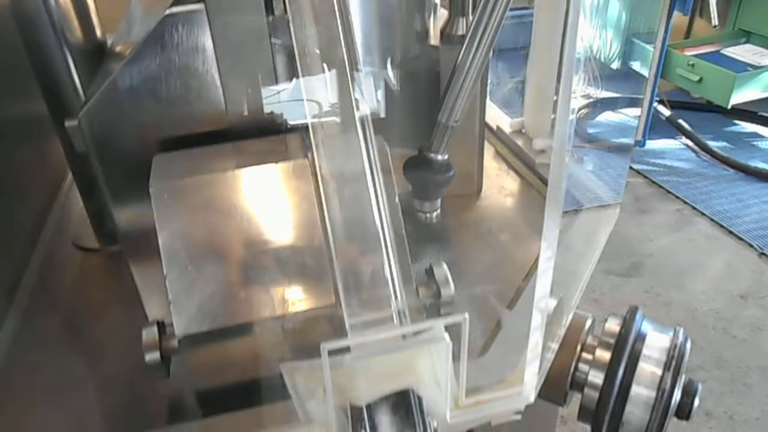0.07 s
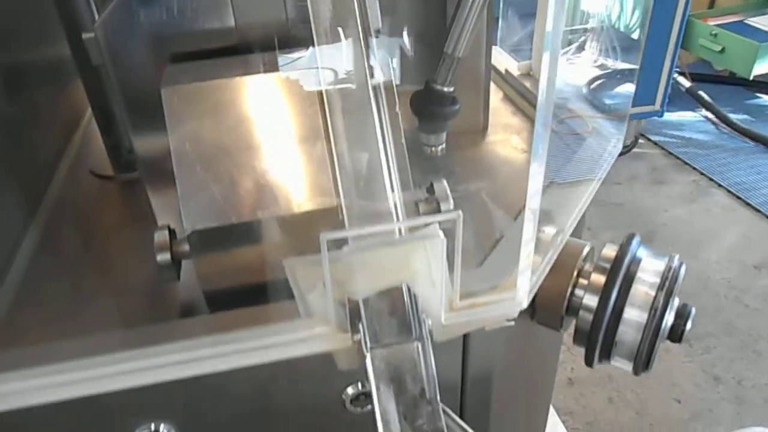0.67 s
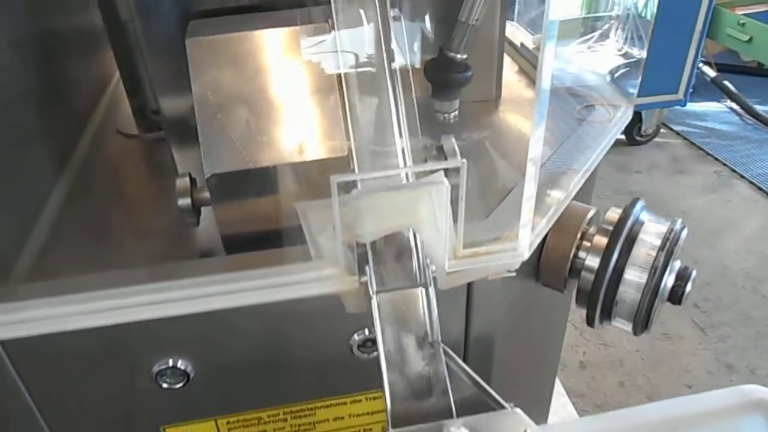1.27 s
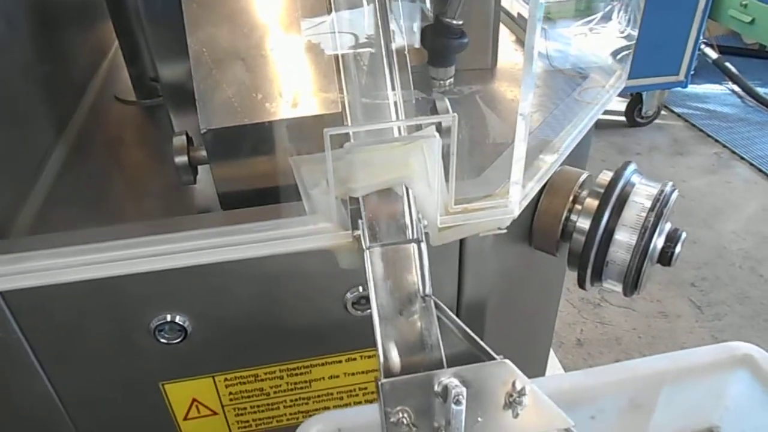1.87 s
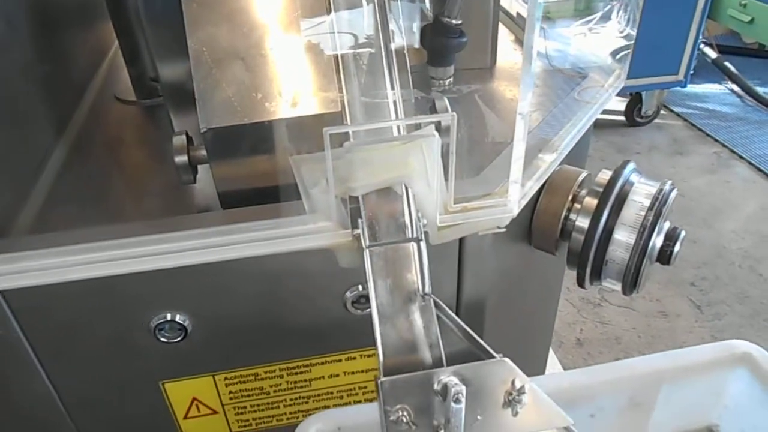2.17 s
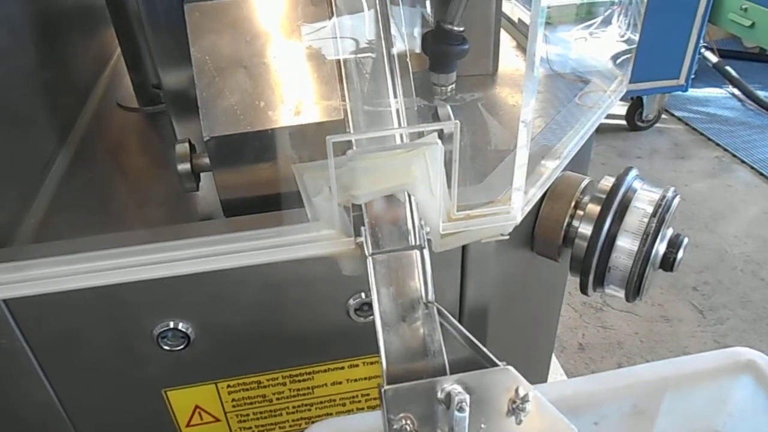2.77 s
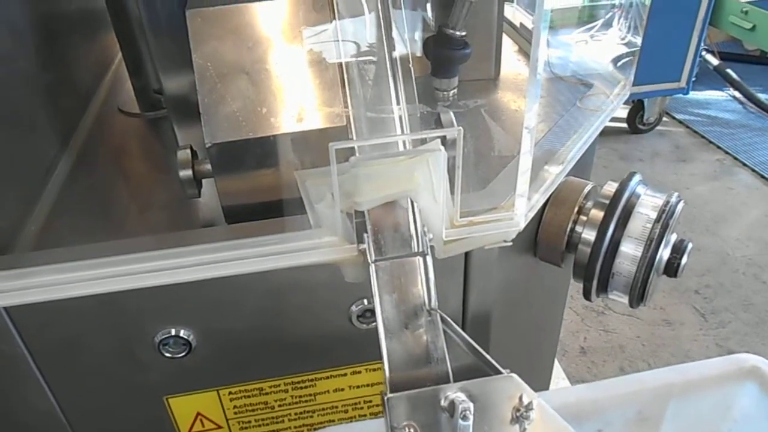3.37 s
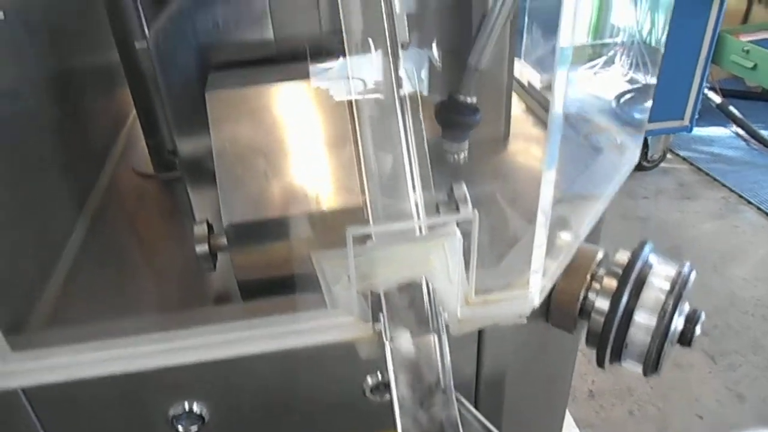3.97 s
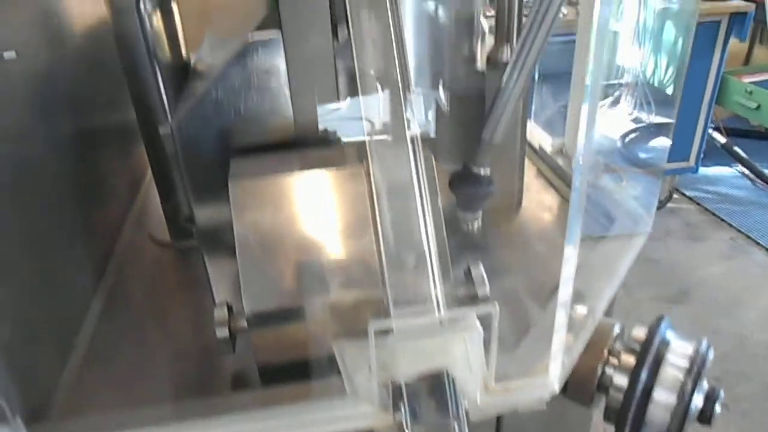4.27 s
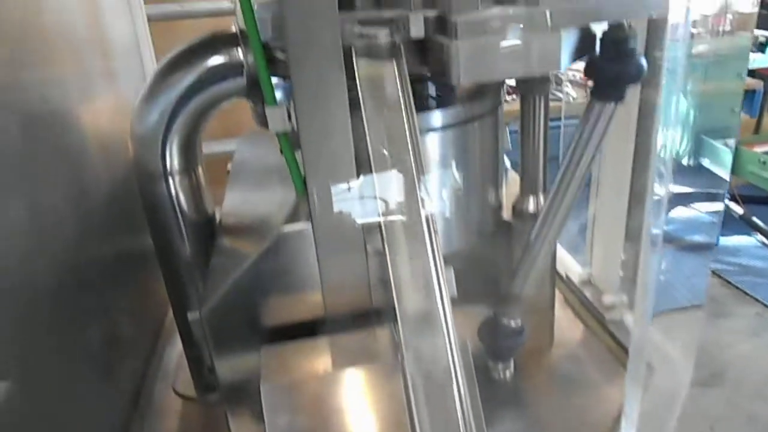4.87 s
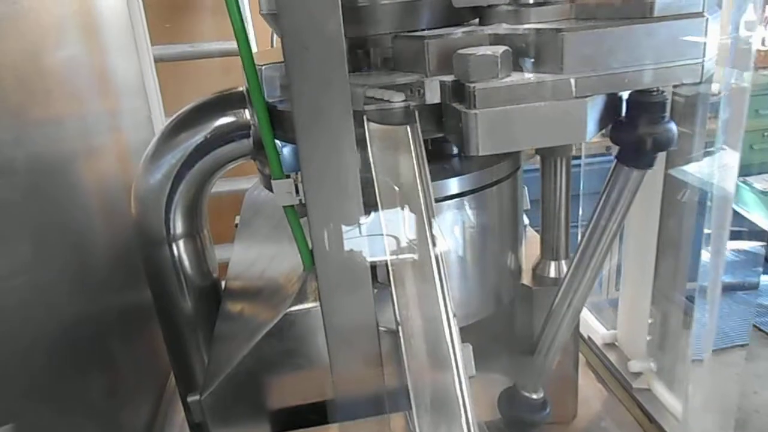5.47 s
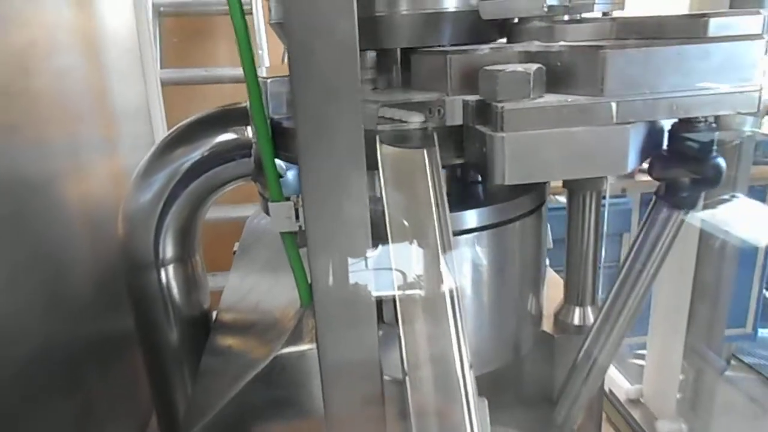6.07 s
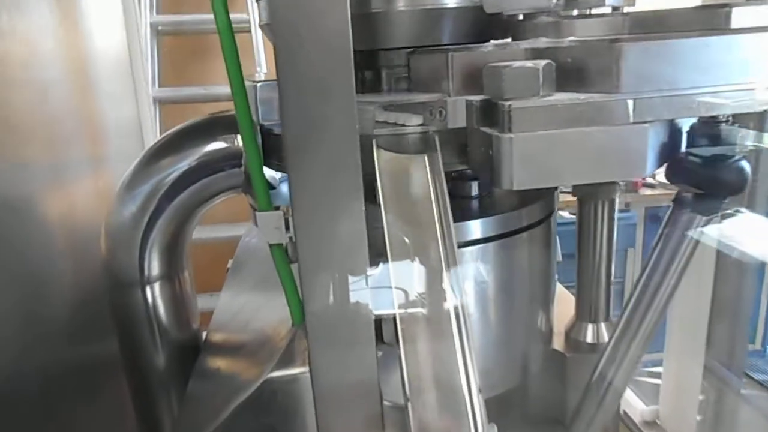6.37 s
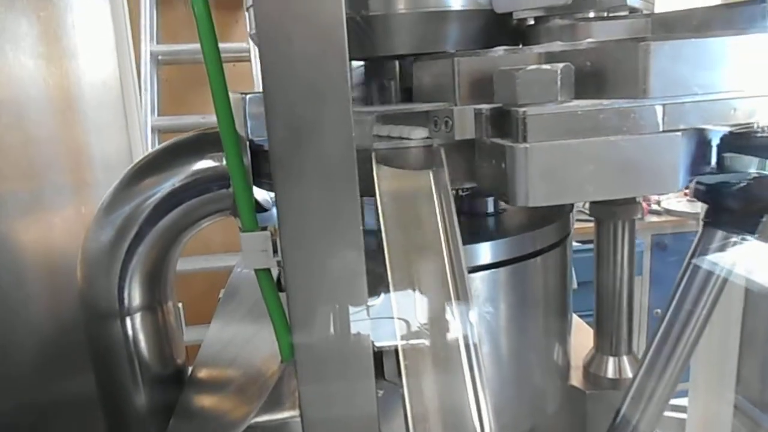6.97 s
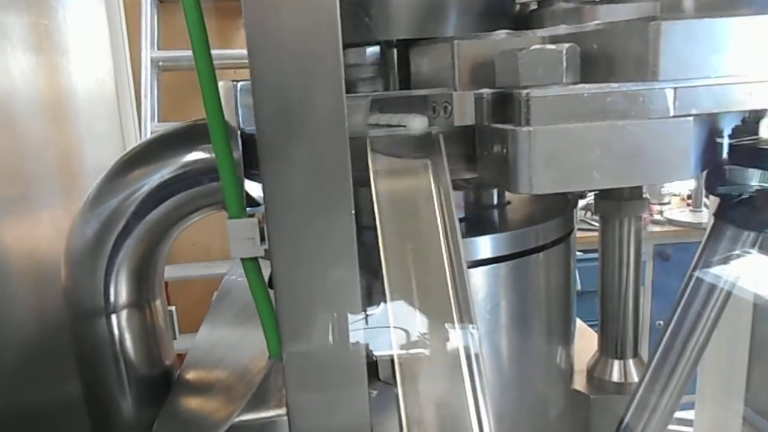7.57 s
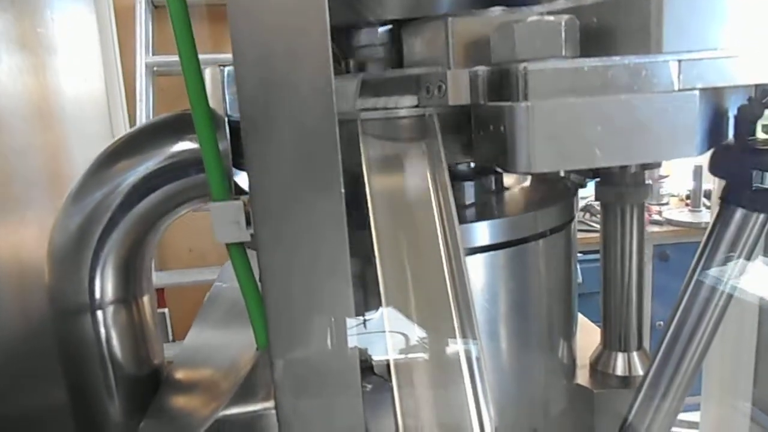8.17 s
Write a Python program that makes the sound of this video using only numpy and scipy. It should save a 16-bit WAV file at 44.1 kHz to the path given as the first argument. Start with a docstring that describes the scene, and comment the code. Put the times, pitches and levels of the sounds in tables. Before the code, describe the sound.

A rotary tablet press runs close to the microphone in a workshop, loud and steady for the whole eight seconds. Its roar is a dense, bright rattle of metal parts ringing a steel casing, over a lower rumble, a motor hum and one clear, mid-pitched whine. About five times a second, each turn adds a thin metal scrape and a very soft thud. Tablets hit the outlet chute with dry, sharp ticks, unevenly spaced at roughly four or five a second, thinning a little after 6 seconds. Brief ringing notes rise from the roar and sink back, for instance near 0.2, 1.6, 3.1 and 4.4 seconds. The microphone is by the chute from about 1.5 to 4 seconds, then passes the guard and reaches the turning head around 6.5 seconds, where the roar becomes slightly fuller and deeper. The machine never stops.

```python
"""A rotary tablet press roars close by in a workshop, heard at the outlet chute, then up at the turret.
Punches rattle in their cams and ring the steel casing, and single notes swell out of the roar.
The drive hums and whines, and every turn brings a soft thud and a metal scrape.
Tablets strike the chute with dry ticks; the hardest push the recorder's gain down, and it creeps back."""
import sys
import numpy as np
from scipy import signal
from scipy.fft import rfft, irfft, next_fast_len
from scipy.io import wavfile
from scipy.ndimage import uniform_filter1d

SR = 44100
rng = np.random.default_rng(int(sys.argv[2]) if len(sys.argv) > 2 else 0)


def digitize_waveform(pressure):
    """Quantize a signal to 16-bit integers and store it at the path in sys.argv[1].

    Rows of a 2-D input are taken as channels; values are limited to [-1, 1].
    """
    field = np.atleast_2d(pressure).T
    bounded = np.clip(field, -1, 1)
    quanta = np.round(bounded * 32767).astype(np.int16)
    wavfile.write(sys.argv[1], SR, quanta)


N = 362061
TIME = np.arange(N) / SR

# The listener's path. Each row: time in seconds, place (0 at the chute, 1 at the guard, 2 at the turret).
LISTENER_PATH = [(0, 0.84), (.5, 0.58), (1.1, 0.26), (1.5, 0), (3.8, 0.1), (4.25, 0.6), (4.6, 0.95),
                 (5.9, 1.03), (6.6, 1.67), (7.3, 1.7), (8.2, 2)]
# Faders of the roar along that path. Each row: time in seconds, rattle level in dB, rumble level in dB.
ROAR_LEVELS = [(0, -21.5, -29.5), (.5, -22.5, -29), (.88, -21.5, -29), (1.3, -23, -29),
               (1.85, -22.5, -29.5), (2.5, -23, -29.5), (2.95, -22.5, -29.5), (3.18, -21, -28.5),
               (3.45, -23, -29), (3.9, -24, -30.5), (4.33, -21.3, -29), (4.7, -24.5, -30.5),
               (5.3, -23, -29.5), (5.7, -22, -28.5), (6.15, -23, -29), (6.5, -21.5, -28.5),
               (7.25, -22, -27.5), (8.2, -20.5, -26.5)]
# The roar's broad colour, with the recorder's dulling of the top above about 10.5 kHz.
# Each row: frequency in Hz, then gain in dB at chute, guard and turret.
BROAD_EQ = [(25, -21, -25, -25), (42, -11, -12, -5.5), (125, -11, -8, -11), (189, -2.5, -4.5, -4.5),
            (420, -4.5, -3, -0.5), (815, -3.5, -3, -1), (2200, 2.5, -1.5, -0.5), (2720, 2, -1, -3),
            (3800, 3.5, 1.5, 0.5), (6240, 0, -2, 1.5), (8300, -4.5, -7.5, -7.5), (10010, -8, -10.5, -10),
            (10930, -26.5, -27.5, -25.5), (12300, -34, -37, -36)]
# Resonances of casing and guards. Each row: pitch in Hz, width in Hz, then strength in dB at chute,
# guard and turret.
CASING_MODES = [(177.5, 49, 2.5, 4, 4), (553, 45, 1, 1.5, -4), (617, 93, 5, -9, 0), (898, 41, 2, 1.5, 2.5),
                (1055, 16, 4.5, 8.5, -10), (1258, 54, 5.5, 0, -10), (1387, 22, 10.5, 5.5, 1),
                (1435, 96, 5.5, 2.5, 1), (1660, 125, -1, 2.5, 9.5), (1783, 43, 10, 13.5, 11),
                (1860, 42, 7, 14, 10.5), (1962, 63, -8, 2, 13), (2034, 410, 0.5, 7.5, 1.5),
                (2182, 49, 9, -11, 11.5), (2420, 210, 7.5, -11, 9.5), (2535, 110, 2.5, -1, -8),
                (2919, 33, 8, 10, 5), (3090, 1140, -12, 0.5, 7.5), (3214, 120, 2, 6.5, -3),
                (4610, 220, -1.5, -15, -12), (5040, 74, 1, -12, -14), (5600, 370, -3.5, 1, -4),
                (7400, 240, -5, -13, 0)]
# The drive's steady hum. Each row: pitch in Hz, level in dB, depth of waver from 0 to 1.
HUM_TONES = [(65.4, -58, .6), (100.7, -47.5, 0.02), (188.8, -43.5, 0.05), (312.6, -47.5, 0.17),
             (376.5, -51.5, .2), (396, -47, 0), (1136, -44, 0)]
# The drive's whine, with dead spots near the turret. Each row: time in seconds, level in dB.
WHINE_LEVELS = [(0.0, -32), (0.6, -35.5), (1.1, -34), (3.7, -37), (4.4, -35), (5.1, -34), (5.33, -39.7),
                (5.6, -33), (6.5, -35.5), (6.72, -39.5), (7.0, -35), (8.2, -33)]
# Steel parts that scrape once a turn. Each row: pitch in Hz, width in Hz, point in the turn from 0 to 1,
# half-length in turns, then level in dB at chute, guard and turret.
STEEL_SCRAPES = [(3420, 47, 0.67, 0.19, -33, -31.5, -31), (3424, 38, 0.07, 0.24, -31.5, -34, -34.5),
                 (3503, 43, 0.61, 0.19, -31, -34.5, -44), (3382, 88, 0.84, 0.18, -42, -45, -27),
                 (3630, 120, 0.32, 0.092, -59, -36, -55)]
# Tablets hitting the chute. Each row: start in seconds, contact level in dB, ring level in dB,
# ring pitch in Hz, knock level in dB.
TABLET_HITS = [(0.074, -2, -16.1, 3660, -27), (0.2776, -1, -21, 3010, -26),
               (0.4473, -5.3, -20.5, 5850, -25), (0.816, -6.9, -18.5, 4380, -26.5),
               (0.9662, -5, -20, 2350, -19), (0.9818, 0.5, -19, 3410, -26),
               (1.282, 0.2, -18.5, 4270, -22.2), (1.4485, -5.5, -19.5, 3840, -25.7),
               (1.775, -7.9, -21, 3280, -26.3), (1.8814, -4.5, -25, 4900, -30.1),
               (2.129, -4, -16.5, 3650, -21.5), (2.498, -6.4, -23, 3130, -24.9),
               (2.6835, -9, -21, 3830, -24), (2.8238, -9, -20.8, 3360, -22),
               (3.211, -4.5, -22.6, 3760, -22.5), (3.2725, -0.5, -17, 4040, -22),
               (3.53, -8, -20, 3190, -21), (3.69, -5.5, -27.6, 4070, -29.9),
               (3.7988, -7.9, -21, 3860, -26.6), (3.9787, -7.8, -22.2, 3430, -25),
               (4.359, -2.5, -17.5, 3590, -24.4), (4.4577, -4, -18.7, 4500, -25),
               (4.582, -1, -23, 3520, -26.5), (4.822, -4, -20.5, 4430, -20.4), (5.038, -9, -21, 3560, -23),
               (5.2053, -2, -19.5, 3630, -25), (5.5222, -6, -21.6, 2860, -26),
               (5.8177, -3.5, -19.0, 3420, -29), (5.8905, -3.5, -21, 3630, -23.4),
               (5.9861, -1.3, -19.5, 4400, -20.5), (6.1412, -5.8, -26, 4710, -21.7),
               (6.6091, -5.5, -18, 3640, -23.6), (6.858, -6.4, -20, 4020, -23),
               (7.1402, -8, -20.7, 3650, -21.9), (7.4398, -9, -19.3, 3000, -30),
               (7.7416, -3.5, -22.5, 4850, -20.5), (8.2017, -3.0, -18.9, 4000, -20)]
# Notes that stand out of the roar. Each row: crest time in seconds, pitch in Hz, width in Hz,
# half-length in seconds, level in dB.
SWELLING_NOTES = [(.21, 3460, 60, .03, -24), (.4, 1865, 40, 0.17, -34), (.5, 3420, 60, .03, -30),
                  (1.24, 3530, 120, .023, -24), (.55, 225, 35, .045, -35), (0.617, 152, 22, 0.054, -34.5),
                  (0.896, 3450, 70, .06, -32.5), (1.608, 3360, 50, .025, -27),
                  (1.725, 1410, 29.8, 0.048, -33), (3.102, 3450, 50, 0.078, -29.5),
                  (3.9, 3490, 120, .12, -33), (4.34, 3730, 70, 0.03, -30), (4.393, 3430, 40, .07, -27),
                  (4.98, 1800, 90, 0.068, -30), (5.698, 5500, 200, 0.24, -36),
                  (6.2, 1406, 110, 0.51, -34.5), (6.9, 3366, 70, .27, -35)]


def undb(db):
    """Decibels to gain."""
    return 10 ** (np.asarray(db) / 20)


def unit(x):
    """Scale to rms 1."""
    return x / np.sqrt(np.mean(x ** 2))


def unit_hit(x, spread_s=.007):
    """Scale a hit so that its energy, spread over spread_s, has rms 1."""
    return x * np.sqrt(spread_s * SR / np.sum(x ** 2))


def curves(table):
    """Automation curves, one for each column after the time."""
    times, *columns = np.transpose(table)
    return [np.interp(TIME, times, column) for column in columns]


def wander(per_s):
    """Smooth random motion of rms 1 that changes about per_s times a second."""
    points = rng.standard_normal(1024)
    path = np.interp(TIME * per_s, np.arange(len(points)), points)
    return unit(uniform_filter1d(path, int(SR / per_s / 2)))


def band(x, lo_hz, hi_hz):
    """Causal band-pass."""
    return signal.sosfilt(signal.butter(2, [lo_hz, hi_hz], "band", fs=SR, output="sos"), x)


def equalise(x, gain):
    """Filter by a gain given as a function of frequency."""
    size = next_fast_len(N)
    hz = np.arange(size // 2 + 1) * SR / size
    return irfft(rfft(x, size) * gain(hz), size)[:N]


def ringing_noise(hz, width_hz):
    """Noise rung through one narrow resonance."""
    return unit(band(rng.standard_normal(N), hz - width_hz / 2, hz + width_hz / 2))


def punch_impacts(per_s, spread_db, rush_db):
    """Countless small impacts of punches in their cams, a few harder than the rest, over an even rush."""
    sizes = undb(spread_db * np.minimum(rng.exponential(size=N), 3.5))
    impacts = (rng.random(N) < per_s / SR) * rng.choice([-1, 1], N) * sizes
    return unit(unit(impacts) + undb(rush_db) * rng.standard_normal(N))


def roar_eq(hz, place, ripple_db=3.0, ripple_hz=38, dense_hz=3600):
    """The roar's EQ at one place: broad colour, the recorder's dulled top and the casing's resonances."""
    broad_hz, *broad_db = np.transpose(BROAD_EQ)
    broad = undb(np.interp(np.log(hz + 1), np.log(broad_hz), broad_db[place]))
    peaks = sum(undb(db[place]) ** 2 / (1 + (2 * (hz - mode_hz) / width_hz) ** 2) ** 2
                for mode_hz, width_hz, *db in CASING_MODES)
    heights = rng.standard_normal(1024)  # the many higher resonances make a fine ripple
    depth_db = ripple_db * np.minimum(hz / dense_hz, 1) ** 2
    ripple = undb(depth_db * np.interp(hz / ripple_hz, np.arange(len(heights)), heights))
    low_cut = np.minimum(hz / broad_hz[0], 1) ** 2
    return broad * np.sqrt(1 + peaks) * ripple * low_cut


def roar(shares, split_hz=1400):
    """The punches ring the casing; bright rattle and low rumble each swell and flutter on their own."""
    steel = 0
    for place, share in enumerate(shares):
        impacts = punch_impacts(per_s=3000, spread_db=2.0, rush_db=2.5)
        steel += np.sqrt(share) * unit(equalise(impacts, lambda hz: roar_eq(hz, place)))
    lows = equalise(steel, lambda hz: 1 / (1 + (hz / split_hz) ** 8))
    rattle_db, rumble_db = curves(ROAR_LEVELS)
    rattle = unit(steel - lows) * undb(rattle_db + 0.37 * wander(40))
    rumble = unit(lows) * undb(rumble_db + 0.18 * wander(13))
    return rattle + rumble


def drive_tone(hz, waver, drift_hz):
    """One tone of the drive, wavering in pitch and strength."""
    phase = 2 * np.pi * np.cumsum(hz + drift_hz * wander(9)) / SR
    return unit(np.sin(phase) * (1 + waver * wander(14)))


def drive():
    """Motor and gears hum under one clear whine."""
    hum = sum(undb(db) * drive_tone(hz, waver, drift_hz=0.84 + hz * 0.00075)
              for hz, db, waver in HUM_TONES)
    whine_db, = curves(WHINE_LEVELS)
    return hum + undb(whine_db) * drive_tone(hz=493.2, waver=0.16, drift_hz=0.94)


def once_a_turn(at, half_length, turns_per_s=5.43):
    """A smooth swell at the same point of every turn."""
    turns_away = (TIME * turns_per_s - at + .5) % 1 - .5
    return np.exp(-.5 * (turns_away / half_length) ** 2)


def thud_and_scrapes(shares, thud_db=-50, uneven_db=2.0):
    """Each turn thuds softly in the frame and rubs steel parts into a brief ring."""
    thud = undb(thud_db) * once_a_turn(at=0.46, half_length=0.079) * ringing_noise(hz=58.3, width_hz=21)
    scrapes = 0
    for hz, width_hz, at, half_length, *places_db in STEEL_SCRAPES:
        level_db = sum(share * db for share, db in zip(shares, places_db)) + uneven_db * wander(3.74)
        scrapes += ringing_noise(hz, width_hz) * once_a_turn(at, half_length) * undb(level_db)
    return thud + scrapes


def chute_knock(t, scatter, hz=790, t60_s=0.034, note_db=-2.5):
    """The chute's hollow knock: a clear note that takes a moment to build, over a dry body."""
    note_hz = hz * (1 + .025 * rng.standard_normal())
    build_up = 1 - np.exp(-t * note_hz)
    note = np.sin(2 * np.pi * note_hz * t) * undb(-60 * t / t60_s) * build_up
    body = band(scatter, lo_hz=650, hi_hz=2300)
    return undb(note_db) * unit_hit(note) + unit_hit(body)


def tablet_ticks(contact_octaves=.8, ring_octaves=0.71, ring_t60_s=0.026, delay_s=.0004, top_hz=10300):
    """Each tablet makes a hard contact, a ring of quick reflections between the guards, and a knock."""
    t = TIME[:SR // 16]
    track = np.zeros(N + len(t))
    for start_s, contact_db, ring_db, ring_hz, knock_db in TABLET_HITS:
        impulse = signal.unit_impulse(len(t))
        click = band(impulse, ring_hz / 2 ** contact_octaves, ring_hz * 2 ** contact_octaves)
        contact = undb(contact_db) * click / np.abs(click).max()
        scatter = rng.standard_normal(len(t)) * undb(-60 * t / ring_t60_s) * (t > delay_s)
        ring = unit_hit(band(scatter, ring_hz / 2 ** ring_octaves, ring_hz * 2 ** ring_octaves))
        knock = chute_knock(t, scatter)
        start = int(start_s * SR)
        track[start:start + len(t)] += contact + undb(ring_db) * ring + undb(knock_db) * knock
    return equalise(track[:N], lambda hz: 1 / np.sqrt(1 + (hz / top_hz) ** 60))  # recorder's dulled top


def swelling_notes():
    """Single notes rise out of the roar and sink back."""
    return sum(ringing_noise(hz, width_hz) * np.exp(-.5 * ((TIME - crest_s) / half_s) ** 2) * undb(db)
               for crest_s, hz, width_hz, half_s, db in SWELLING_NOTES)


def gain_control(x, ceiling_db=-5.2, cut_share=.6, attack_s=.025, recovery_db_per_s=6.7):
    """Peaks over the ceiling duck the gain by a share of their excess; it recovers at a steady rate."""
    excess_db = 20 * np.log10(np.maximum(np.abs(x).max(axis=0) / undb(ceiling_db), 1))
    recovered_db = recovery_db_per_s * TIME
    cut_db = np.maximum.accumulate(cut_share * excess_db + recovered_db) - recovered_db
    attack = int(attack_s * SR)
    eased_cut_db = signal.fftconvolve(cut_db, np.ones(attack) / attack)[:N]
    return x * undb(-eased_cut_db)


def scene():
    """The press in mono, as the listener moves to the chute, then past the guard up to the turret."""
    place, = curves(LISTENER_PATH)
    shares = [np.maximum(1 - np.abs(place - k), 0) for k in range(3)]  # crossfade of the three places
    return (roar(shares) + drive() + thud_and_scrapes(shares) + tablet_ticks() + swelling_notes())[None]


def record(dry):
    """The recorder ducks after hard ticks, rounds the highest peaks and cuts the top."""
    peak_limit, top_hz = .68, 12200
    ducked = gain_control(dry)
    rounded = ducked / (1 + (ducked / peak_limit) ** 8) ** .125
    return signal.sosfiltfilt(signal.ellip(8, .05, 50, top_hz, fs=SR, output="sos"), rounded)


dry = scene()
out = record(dry)
digitize_waveform(out)
```